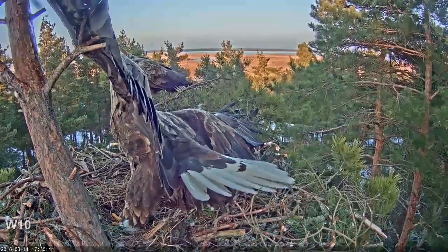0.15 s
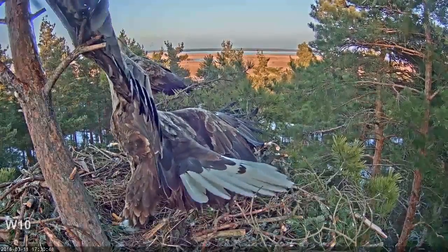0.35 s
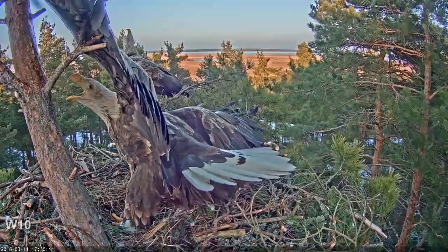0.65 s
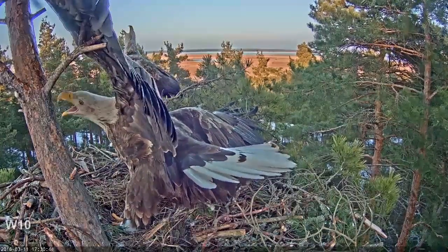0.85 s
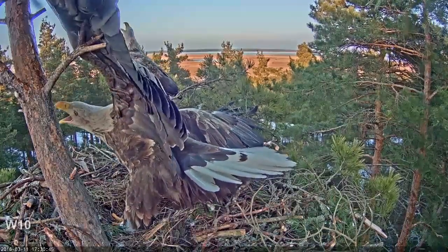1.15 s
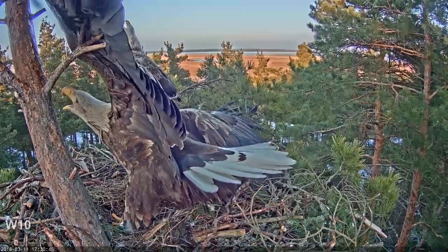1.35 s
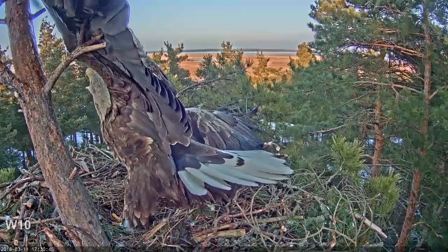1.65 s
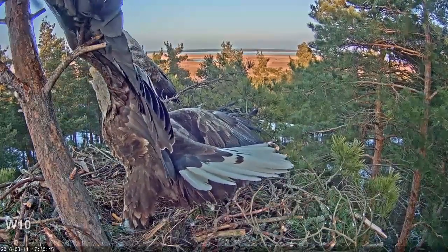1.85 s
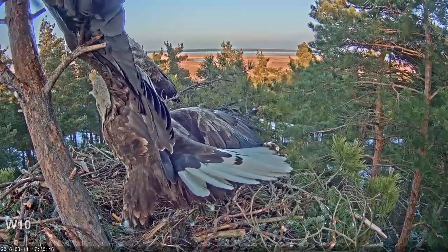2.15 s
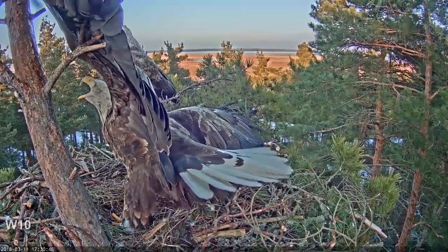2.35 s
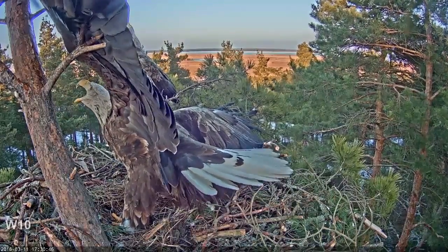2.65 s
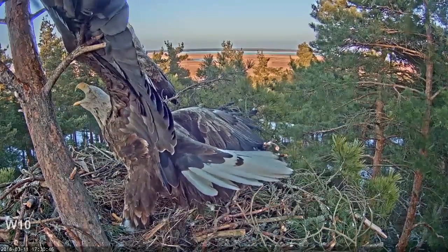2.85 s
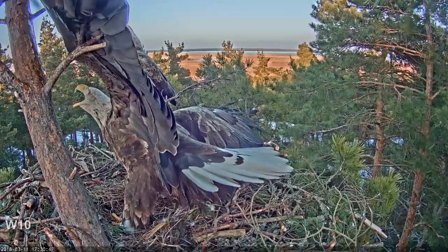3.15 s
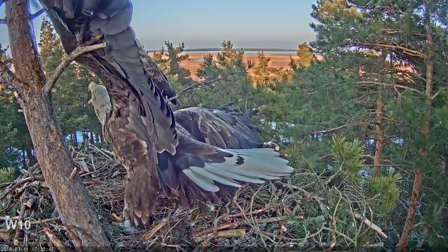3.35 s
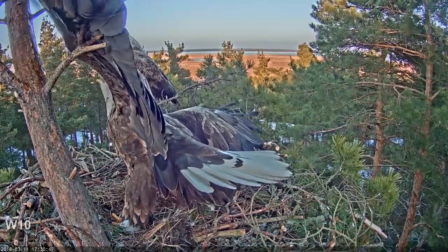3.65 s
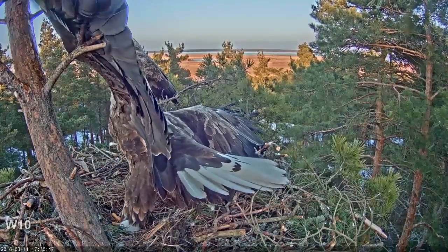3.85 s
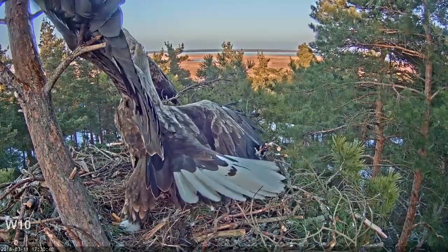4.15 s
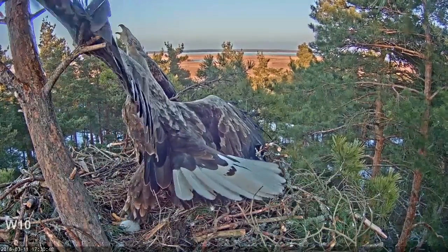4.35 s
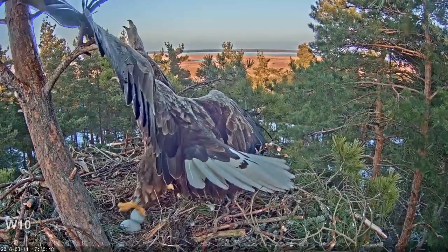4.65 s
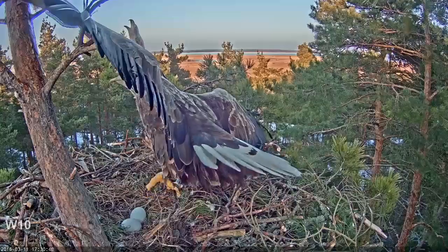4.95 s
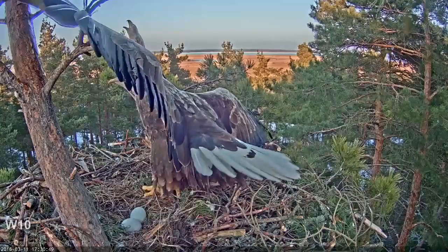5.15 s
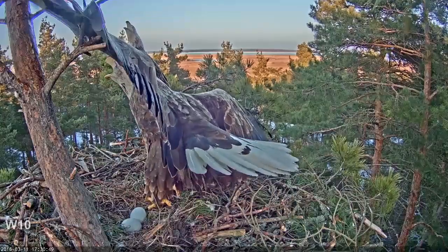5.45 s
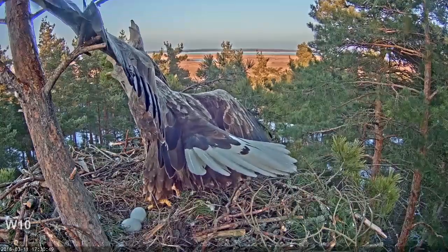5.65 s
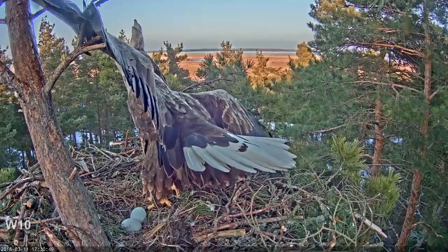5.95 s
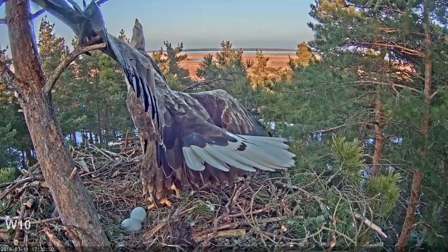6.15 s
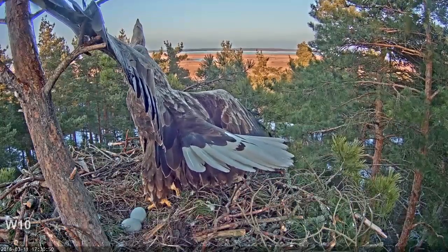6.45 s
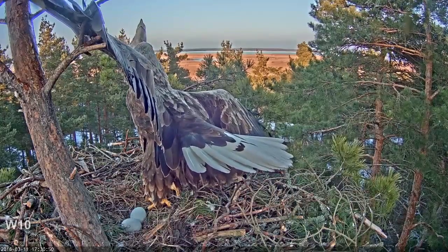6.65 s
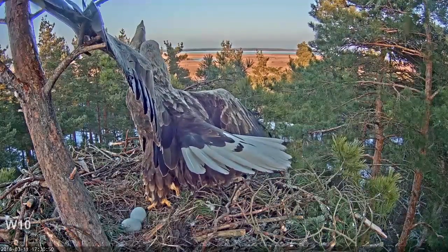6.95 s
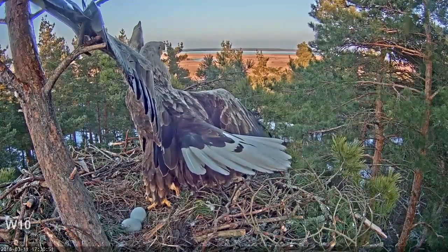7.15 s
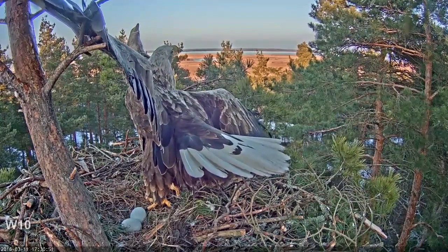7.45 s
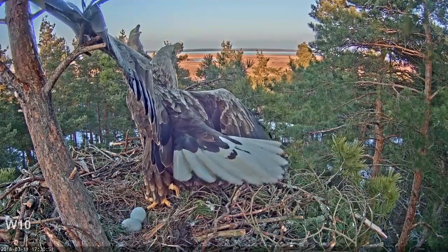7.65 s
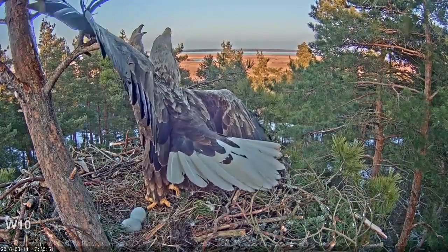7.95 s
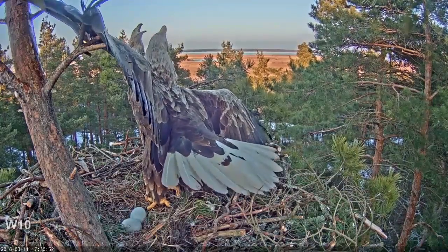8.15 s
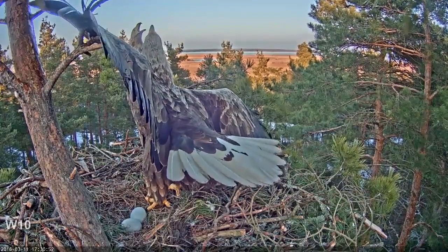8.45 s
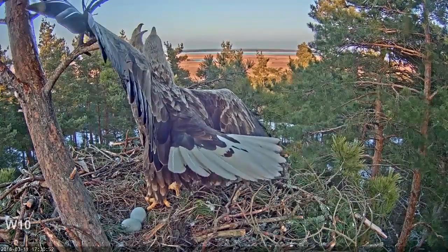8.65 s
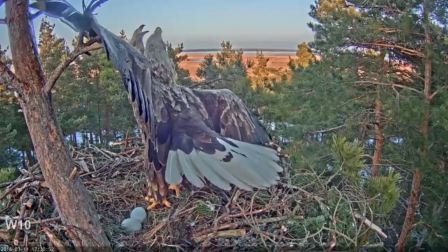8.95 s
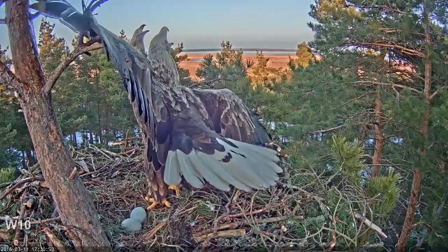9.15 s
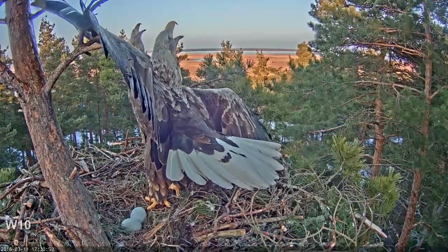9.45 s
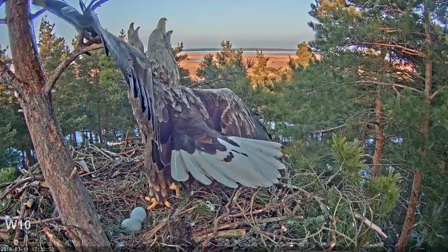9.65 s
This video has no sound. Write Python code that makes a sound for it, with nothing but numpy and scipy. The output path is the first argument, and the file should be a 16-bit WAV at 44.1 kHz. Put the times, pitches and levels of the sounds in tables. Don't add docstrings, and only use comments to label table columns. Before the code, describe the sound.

Low wind rumble and faint forest hiss lie beneath two eagles calling close to the microphone. From 0 seconds the mate gives short, high, hoarse calls that climb in two steps, about three or four a second. The near bird joins at 0.1 with lower, stronger arched yelps, roughly five a second, swelling to a distorted peak around 0.7-1.6. A rasp breaks in near 1.9; yelping resumes at 2.1 and fades to clipped fragments near 3.7. Another run lasts from about 4 to 5.9, with creaks, clicks and sputters between calls. From 6 to 7.6 the mate calls alone, clearer, creaking slightly. The near bird tries again at 7.7, breaks into a strong rasp at 8.3, then gives rougher, weaker yelps from 8.7 to the end, while the mate turns higher and mostly hoarse. Trees return a long, lumpy echo throughout.

```python
import sys
import numpy as np
from scipy import signal
from scipy.fft import rfft, irfft, next_fast_len
from scipy.io import wavfile
from scipy.ndimage import uniform_filter1d

SR = 44100
rng = np.random.default_rng(int(sys.argv[2]) if len(sys.argv) > 2 else 0)


def convert_level_to_amplitude(level_db):
    exponent = np.asarray(level_db, float) / 20
    return 10 ** exponent


def wav_out(sig):
    wavfile.write(sys.argv[1], SR, np.round(np.clip(np.atleast_2d(sig).T, -1, 1) * 32767).astype(np.int16))


N = 431725

MATE_HOARSE_ABOVE_HZ = 1250


def at_hz(points, hz):
    known_hz, known_db = np.transpose(points)
    return np.interp(np.log(hz), np.log(known_hz), known_db)


def band(x, low_hz, high_hz):
    return signal.sosfilt(signal.butter(2, [low_hz, high_hz], "band", fs=SR, output="sos"), x)


def drift(rate_hz):
    r = np.exp(-2 * np.pi * rate_hz / SR)
    slow = signal.lfilter([1], [1, -2 * r, r * r], rng.standard_normal(N + SR))[SR:]
    return slow / slow.std()


def air():
    # frequency in Hz, strength in dB per Hz.
    wind_spectrum = [(30, -4), (80, -13), (160, -12.5), (600, -22), (5000, -50), (14000, -53)]
    hz = np.maximum(np.fft.rfftfreq(N, 1 / SR), 1)
    noise = irfft(rfft(rng.standard_normal(N)) * convert_level_to_amplitude(at_hz(wind_spectrum, hz)), N)
    level_db = -47 + 3.4 * drift(5.2)
    return convert_level_to_amplitude(level_db) * noise / noise.std()


def forest(x):
    # band centre in Hz, time to fall by 60 dB in seconds.
    echo_times = [(1500, 0.65), (4000, 1.07), (9000, 1.06)]
    t = np.arange(int(1.5 * SR)) / SR
    earlier = x[int(.22 * SR):int(.44 * SR)]
    clumps = convert_level_to_amplitude(3.5 * drift(25)[:len(t)]) * (1 + np.exp(-t / .03))
    echo = np.zeros(len(t))
    for hz, t60 in echo_times:
        echo += band(rng.standard_normal(len(t)), hz / 2.03, hz * 2.36) * convert_level_to_amplitude(-60 * t / t60)
    size = next_fast_len(N + 2 * len(t))
    ringing = irfft(rfft(np.r_[earlier, x], size) * rfft(echo * clumps, size), size)
    return ringing[len(earlier):][:N]


def voice(calls, throat, jitter, flutter_db, patchy_db, breath_db, hiss_db, stutter_db,
          attack_s, release_s):
    out = np.zeros(N)
    wobble, flutter, breath, catch = drift(121), drift(68), drift(600), drift(183)
    hiss = drift(2500)
    for rows in calls:
        s, pitch_hz, level_db = np.transpose(rows)
        first = max(int((s[0] - attack_s) * SR), 0)
        last = min(int((s[-1] + release_s) * SR), N)
        at = np.arange(first, last)
        t = at / SR
        onset = np.exp(-np.maximum(t - s[0], 0) / 0.019)
        edge = np.clip(np.minimum((t - s[0]) / attack_s, (s[-1] - t) / release_s) + 1, 0, 1)

        hz = uniform_filter1d(np.interp(t, s, pitch_hz), size=150)
        hz *= 1 - .13 * (1 - edge)
        hz *= 1 + jitter * (1 + 3 * onset) * wobble[at]
        phase = 2 * np.pi * np.cumsum(hz) / SR

        effort_db = np.interp(t, s, level_db)
        below_loudest_db = effort_db - level_db.max()
        stack = np.sin(phase)
        for k in range(2, 7):
            own_db = at_hz(throat, k * hz) + 0.3 * (k - 2) * below_loudest_db
            own_db += patchy_db * flutter[at - k * SR // 10]
            stack += convert_level_to_amplitude(own_db) * np.cos(k * phase)
        stack += convert_level_to_amplitude(hiss_db + .5 * effort_db + 3.2 * onset) * hiss[at] * np.cos(3 * phase)

        unsteady_db = flutter_db * flutter[at] + stutter_db * onset * catch[at]
        gain = edge ** 2 * convert_level_to_amplitude(effort_db + unsteady_db)
        breathy = 1 + convert_level_to_amplitude(breath_db + 5.3 * onset) * breath[at]
        out[at] += gain * stack * breathy
    return out


def mate_call(s, rise, first_hz, top_hz, level_db):
    # share of the low step's time, share of the climb, level in dB.
    low_step = [
        (0, -.05, -17),
        (.3, .04, -6),
        (.85, .26, -.4),
    ]
    # seconds after the jump, share of the climb, level in dB.
    high_step = [
        (.003, .68, -9),
        (.016, .9, -5),
        (.032, 1.0, 0.),
        (.047, 1.0, -4),
        (.062, .97, -17),
    ]
    step_s = max(rise - .032, .013)
    hoarse = first_hz > MATE_HOARSE_ABOVE_HZ
    shape = [(step_s * share, climb, db - 5 * hoarse) for share, climb, db in low_step]
    shape += [(step_s + t, climb, db) for t, climb, db in high_step]
    call_db = level_db + 7 - 1.2 * hoarse
    return [(s + t, first_hz + climb * (top_hz - first_hz), call_db + db) for t, climb, db in shape]


def mate():
    # start in seconds, rise time in
    # seconds, first pitch in Hz, top pitch in Hz, level in dB.
    mate_calls = [(0.05, 0.043, 1397, 2023, -14.5), (0.328, 0.035, 1438, 1997, -16),
                  (0.65, 0.035, 1418, 2022, -20.5), (0.93, 0.049, 1424, 1965, -28.5),
                  (1.231, 0.045, 1427, 1980, -41.5), (1.537, 0.059, 1147, 1846, -36.5),
                  (1.846, 0.04, 1270, 1700, -25), (2.082, 0.12, 1457, 1983, -35), (2.351, 0.062, 1436, 2007, -27),
                  (2.617, 0.049, 1388, 1960, -25), (2.9, 0.051, 1260, 1976, -21), (3.179, 0.067, 1460, 1950, -25),
                  (3.461, 0.042, 1443, 1925, -23.5), (3.743, 0.042, 1285, 1915, -19),
                  (4.018, 0.045, 1270, 1723, -21), (4.278, 0.047, 1420, 1996, -20),
                  (4.609, 0.055, 1520, 2018, -21), (4.891, 0.049, 1423, 1966, -18),
                  (5.149, 0.035, 1414, 1913, -18),
                  (5.45, 0.048, 1123, 1785, -21), (5.757, 0.049, 1128, 1799, -18.5),
             (6.061, 0.053, 1140, 1753, -20.5), (6.361, 0.048, 1140, 1745, -21),
             (6.675, 0.057, 1147, 1725, -21), (7.016, 0.066, 1117, 1660, -21),
             (7.371, 0.058, 1192, 1783, -17.5), (7.674, 0.055, 1230, 1833, -17),
             (7.962, 0.047, 1320, 1860, -17.5), (8.235, 0.047, 1643, 2020, -17.5),
             (8.505, 0.045, 1684, 2090, -17.5), (8.828, 0.04, 1626, 2077, -18.5),
             (9.095, 0.045, 1683, 2063, -20), (9.359, 0.05, 1119, 1810, -19),
             (9.655, 0.045, 1600, 2068, -19.5)]
    # frequency in Hz, level in dB.
    throat = [(2000, -8.5), (2500, .3), (2950, -11), (3500, -7), (4400, -26.5), (5300, -22), (6100, -31.5),
              (7000, -25.5), (9000, -41.5)]
    rows = mate_calls
    clear_calls = [mate_call(*row) for row in rows if row[2] < MATE_HOARSE_ABOVE_HZ]
    hoarse_calls = [mate_call(*row) for row in rows if row[2] > MATE_HOARSE_ABOVE_HZ]
    clear = voice(clear_calls, throat, jitter=0.009, flutter_db=1.8, patchy_db=2.0, breath_db=-21,
                  hiss_db=-30.5, stutter_db=1.0, attack_s=0.0039, release_s=.005)
    hoarse = voice(hoarse_calls, throat, jitter=0.016, flutter_db=2.6, patchy_db=3.0, breath_db=-15.5,
                   hiss_db=-29, stutter_db=1.2, attack_s=0.005, release_s=.005)
    return clear + hoarse


def yelp(grip, held, top_hz, level_db, slip_hz):
    lead = max(.0145 + .0006 * level_db, .010)
    room = min(held / .04, 1)
    lock_under_hz, lock_db = 125, -0.5
    slip_to_hz = top_hz - .7 * lock_under_hz - slip_hz
    return [(grip - lead, 1130, level_db - 12),
            (grip - .45 * lead, 1046.4, level_db - 13),
            (grip, top_hz - lock_under_hz, level_db + lock_db),
            (grip + room * .008, slip_to_hz, level_db + lock_db - slip_hz / 70),
            (grip + room * .015, top_hz - 45, level_db - .6),
            (grip + .55 * held, top_hz, level_db),
            (grip + .89 * held, top_hz - 45, level_db - 1.2),
            (grip + held, top_hz - 215, level_db - 4.5)]


def near_bird():
    # voice grips in seconds, held in seconds, top pitch in Hz,
    # level in dB, slip back in Hz.
    near_yelps = [(.096, .056, 1557, -1.5, 80), (.297, .051, 1537, -3, 0.5), (.502, .050, 1500, -3, 0),
                  (.703, .051, 1510, 5, 60), (.903, .061, 1500, 9, 210), (1.122, .057, 1505, 7, 210),
                  (1.340, .060, 1560, 5, 60), (1.556, .050, 1555, 3, 40), (1.765, .010, 1430, -3, 0),
                  (2.110, .088, 1585, -1.5, 190), (2.346, .056, 1530, .6, 30), (2.558, .061, 1500, 3.2, 210),
                  (2.780, .059, 1495, 3.2, 160), (3.012, .050, 1500, 2, 140), (3.222, .052, 1500, 3, 120),
                  (3.434, .045, 1500, 1.5, 170), (3.645, .007, 1250, -10, 0), (3.772, 0.0061, 1750, -7, 0),
                  (3.977, .034, 1393, -6.5, 0), (4.262, .066, 1649, -6.5, 200), (4.465, .062, 1511, -5, 90),
                  (4.687, .044, 1457, -3.5, 0), (4.896, .057, 1516, 1.6, 0), (5.125, .048, 1524, 2.2, 0),
                  (5.343, .053, 1520, 2, 0), (5.581, .057, 1516, 3, 0), (5.862, .071, 1272, -6, 30),
                  (7.700, .042, 1522, -11, 40), (7.868, .008, 1480, -9, 0), (8.227, .024, 1370, -6, 0),
                  (8.692, .048, 1735, -6, 90), (8.911, .044, 1545, -4.5, 0), (9.111, .048, 1560, -6, 0),
                  (9.318, .052, 1539, -5, 0), (9.531, .054, 1537, -4.5, 0), (9.762, .028, 1403, -3, 130)]
    # frequency in Hz, level in dB.
    throat = [(1900, -18.5), (2520, -6), (2880, -22), (3300, -15.5), (4400, -34), (6000, -42), (9000, -52)]
    rows = near_yelps
    tired_from_s = 7
    fresh_yelps = [yelp(*row) for row in rows if row[0] < tired_from_s]
    tired_yelps = [yelp(*row) for row in rows if row[0] > tired_from_s]
    fresh = voice(fresh_yelps, throat, jitter=0.0051, flutter_db=.8, patchy_db=4.5, breath_db=-23.5,
                  hiss_db=-31, stutter_db=4.6, attack_s=.008, release_s=0.006)
    tired = voice(tired_yelps, throat, jitter=0.008, flutter_db=1.6, patchy_db=4.0, breath_db=-20,
                  hiss_db=-33, stutter_db=3.5, attack_s=.007, release_s=0.007)
    return fresh + tired


def slips():
    # start in seconds, length in seconds, peak in dB.
    near_draws = [(.1635, .018, -14.5), (.372, .001, -15.5), (.5745, .007, -14.5), (.778, .007, -13.5),
                  (1.202, .001, -15), (1.422, .012, -14.5), (1.6264, .014, -15.5), (1.9084, .001, -9.5),
                  (1.9286, .02, -17), (2.228, .001, -13.5), (2.4255, .001, -17.5), (2.8634, .001, -16.5),
                  (3.2996, .001, -13.5), (3.5016, .001, -15.5), (3.7864, .001, -18), (3.8065, .007, -14.5),
                  (4.0806, .001, -16), (4.3587, .001, -18.5), (4.9795, .001, -17.5), (5.1984, .001, -16.5),
                  (8.004, .001, -14.5), (8.0225, .006, -17), (8.040, .006, -14), (8.3766, .001, -12),
                  (8.3957, .006, -13), (8.7647, .019, -18), (8.9784, .006, -13.5), (9.1817, .006, -14),
                  (9.3906, .007, -18), (9.6067, .006, -17.5)]
    # last slip in seconds, peak in dB.
    mate_draws = [(.4295, -19), (1.0734, -27), (2.7233, -25), (3.557, -24), (3.8417, -23), (4.1191, -19.5),
                  (4.377, -27), (5.5408, -21.5), (5.871, -25), (6.1775, -20), (6.4715, -21), (6.7947, -21),
                  (7.1317, -20), (7.4872, -23), (7.778, -19), (8.0736, -22.5), (8.330, -22), (8.6102, -22),
                  (8.942, -22), (9.205, -23), (9.470, -23), (9.752, -22)]
    # how long before the last slip this one comes, in seconds.
    mate_before = [0, .0072, .0123, .0165, .0204, .024]
    gap_s = .0064
    chance = rng.standard_normal((len(near_draws + mate_draws), 2, 6))
    found = []
    for (s, length, db), (late, uneven) in zip(near_draws, chance):
        for k in range(1 + round(length / gap_s)):
            time = s + gap_s * k * (1 + 0.065 * late[k])
            found.append((time, db - 3 * k + (k > 0) * 0.5 * uneven[k]))
    for (s, db), (late, uneven) in zip(mate_draws, chance[::-1]):
        for k, before in enumerate(mate_before):
            time = s - before * (1 + .04 * late[k])
            found.append((time, db - 1.2 * k + 1.5 * uneven[k]))
    return np.transpose(found)


def creaks():
    clicks = np.zeros(N)
    s, peak_db = slips()
    clicks[(s * SR).astype(int) - 36] = convert_level_to_amplitude(peak_db)
    nearby = uniform_filter1d(clicks, size=1100) * 900
    crowd = nearby * (rng.random(N) < 400 / SR) * rng.standard_normal(N)
    clicks = band(clicks + convert_level_to_amplitude(-18) * crowd, 65, 2200)
    thin_db = 3.27 * drift(68)
    deep = convert_level_to_amplitude(32.5) * band(clicks * convert_level_to_amplitude(-thin_db), 151, 513)
    middle = convert_level_to_amplitude(30.5) * band(clicks, 398, 1110)
    thin = convert_level_to_amplitude(21) * band(clicks * convert_level_to_amplitude(thin_db), 980, 1600)
    return deep + middle + thin


def sputters():
    # time in seconds, peak in dB, pitch in Hz.
    bursts = [(0.7782, -9, 1183), (4.069, -1, 1600), (0.9786, 3.5, 1120), (1.1919, 5, 1370),
              (7.9935, -4, 1500), (1.4243, -16, 1044), (1.612, -13, 1550), (1.627, -8, 1300),
              (2.2287, -16, 1130), (2.4112, -6, 1600), (1.8993, -3, 1500), (2.426, -9, 1280),
              (2.6352, -6, 1016), (2.8651, -12.5, 1140), (3.0778, 0.5, 1250), (3.2885, -6, 1720),
              (3.302, -12.5, 1230), (1.890, -6, 1650), (3.8086, -15, 1260), (3.8132, -9, 1390),
              (4.059, -0.5, 1610), (4.5402, -6, 1455), (4.7435, -5, 1196), (4.967, -2.5, 1416),
              (5.187, -5, 1600), (5.413, -1, 1295), (5.6423, -12, 1370), (5.655, -1.5, 1370),
              (5.9382, -12, 1360), (8.0228, -10, 1030)]
    out = np.zeros(N + SR)
    t = np.arange(-120, 260) / SR
    swell = np.where(t < 0, np.exp(-(t / .0012) ** 2), np.exp(-t / .002))
    for s, peak_db, hz in bursts:
        phase = 2 * np.pi * hz * (t - 12 * t ** 2)
        stack = np.sin(phase) + convert_level_to_amplitude(-17) * np.cos(2 * phase)
        start = int(s * SR) - 120
        out[start:start + len(t)] += convert_level_to_amplitude(peak_db) * swell * stack
    return out[:N]


def rasps():
    # start in seconds, length in seconds, level in dB.
    broken_calls = [
        (1.88, 0.075, -23),
        (4.55, 0.2, -38),
        (8.325, 0.048, -20),
    ]
    t = np.arange(N) / SR
    gate = np.zeros(N)
    for s, length, db in broken_calls:
        gate += convert_level_to_amplitude(db) * np.sin(np.pi * np.clip((t - s) / length, 0, 1))
    noise = rng.standard_normal(N) * gate * convert_level_to_amplitude(5.0 * drift(100))
    return 2 * band(noise, 1050, 2300) + .5 * band(noise, 2300, 4400)


def scene():
    near = near_bird() + sputters()
    far = mate()
    breaths = creaks() + rasps()
    echoes = forest(convert_level_to_amplitude(-55) * near + convert_level_to_amplitude(-46) * far + convert_level_to_amplitude(-52) * breaths)
    return (near + far + breaths + echoes + air())[None]


def top_cut(x):
    return signal.sosfilt(signal.butter(12, 15260, fs=SR, output="sos"), x)


def record(dry):
    bent = dry + 0.014 * dry ** 2
    hardness, ceiling = 16, .99
    clipped = bent / (1 + np.abs(bent / ceiling) ** hardness) ** (1 / hardness)
    memory = np.exp(-1 / (.06 * SR))
    load = signal.lfilter([1 - memory], [1, -memory], clipped ** 2)
    sagged = clipped * convert_level_to_amplitude(-2.5 * load) + .004
    dulled = signal.sosfilt(signal.cheby2(8, 22, 14800, fs=SR, output="sos"), sagged)
    return top_cut(np.clip(dulled, -1, 1))


dry = scene()
out = record(dry)
wav_out(out)
```